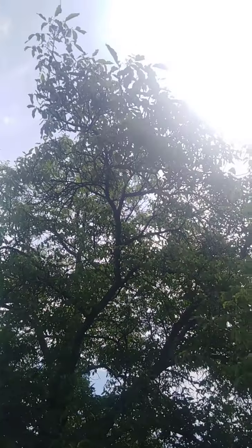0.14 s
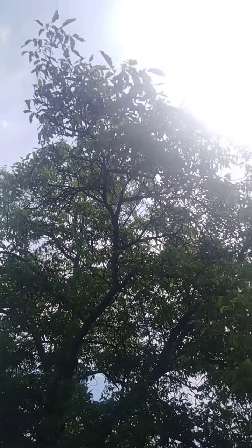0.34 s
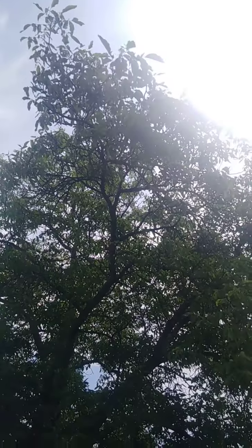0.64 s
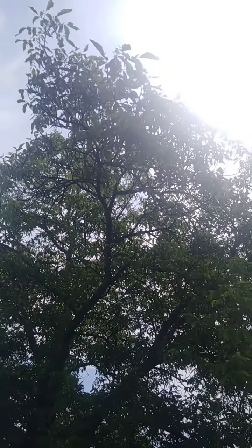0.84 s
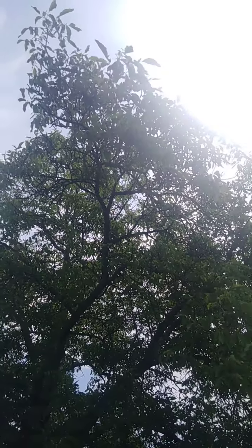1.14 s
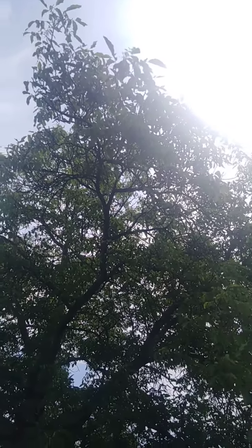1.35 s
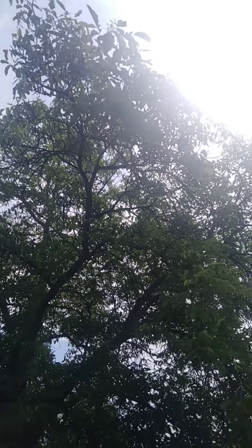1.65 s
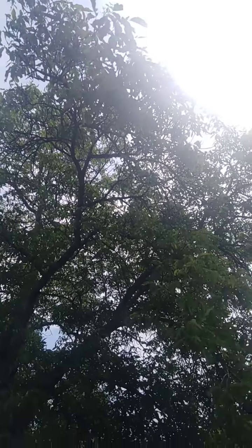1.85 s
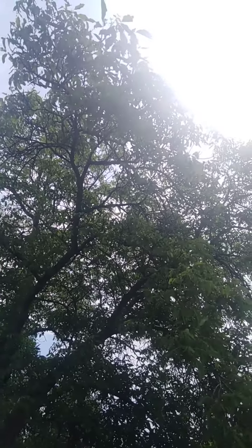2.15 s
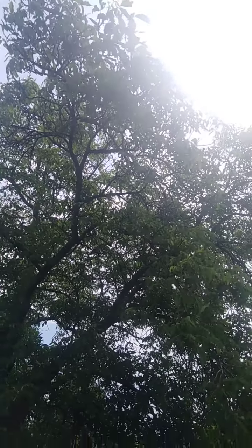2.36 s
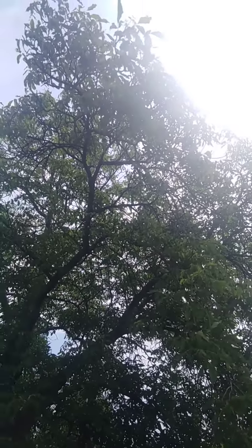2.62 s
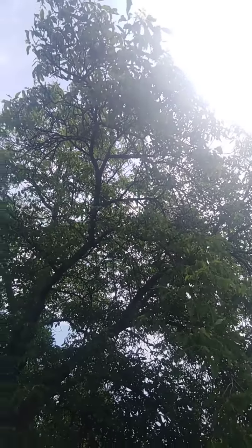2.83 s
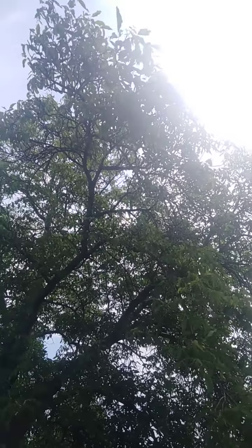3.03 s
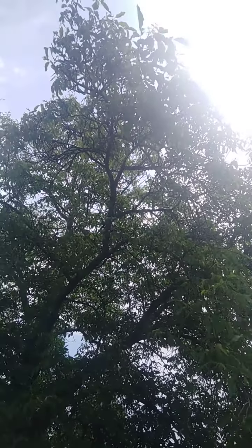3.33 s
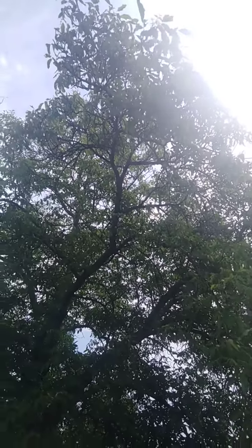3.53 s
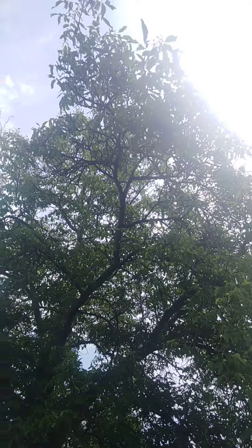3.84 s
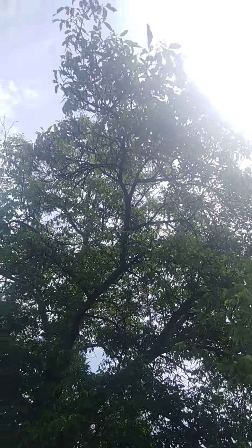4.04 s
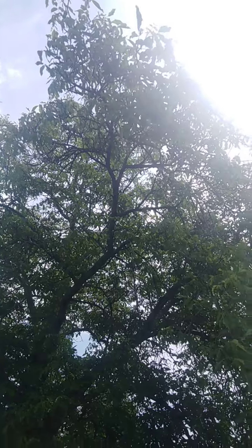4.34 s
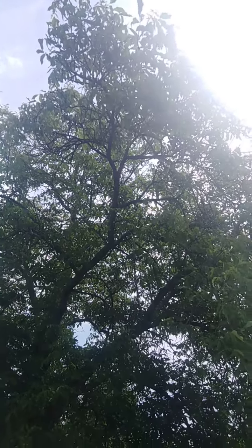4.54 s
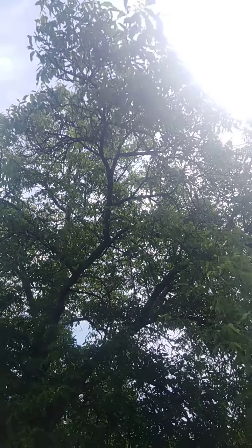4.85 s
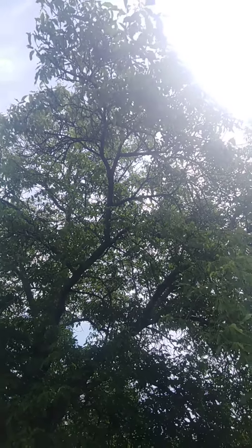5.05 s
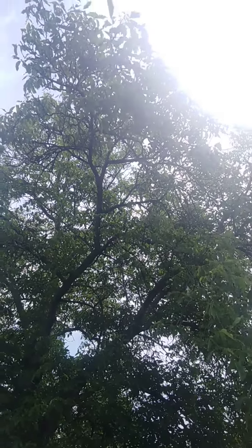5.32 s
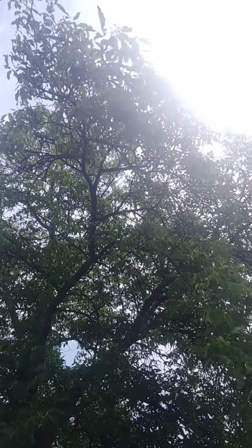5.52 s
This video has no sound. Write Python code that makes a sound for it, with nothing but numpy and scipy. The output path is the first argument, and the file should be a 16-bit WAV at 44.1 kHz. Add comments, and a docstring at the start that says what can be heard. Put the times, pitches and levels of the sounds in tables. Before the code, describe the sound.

Outdoors among leafy trees, a handheld microphone catches the end of one cuckoo call, then sharp knocks and snaps from the holding hand. Low wind gusts swell on the left, ease, and return harder. Over them the cuckoo gives three full two-note calls, softly echoed by the trees, while small birds whistle, chirp and rasp faintly.

```python
"""The far echo of a cuckoo's "cuck" opens the scene, over faint hiss and light wind, as fingers brush the
microphone's case. The "oo" follows, a swelling hoot thrown back by the trees; then the holding hand knocks
and snaps: decaying thuds, case rattle and noise cracks. Wind noise gusts twice with a lull between, mostly
at the left port, with hard low pushes. From 1.6 s small birds whistle, chirp and rasp in trilled tones and
rattling noise, while the cuckoo gives three full "cuck-oo"s."""
import sys
import numpy as np
from scipy import signal
from scipy.fft import rfft, irfft
from scipy.io import wavfile
from scipy.ndimage import uniform_filter1d

SR = 44100
rng = np.random.default_rng(int(sys.argv[2]) if len(sys.argv) > 2 else 0)


def wav_out(sig):
    """Save sig, one row per channel (or a flat mono array), as 16-bit PCM at SR to the path in sys.argv[1]."""
    wavfile.write(sys.argv[1], SR, np.round(np.clip(np.atleast_2d(sig).T, -1, 1) * 32767).astype(np.int16))


N = 250488
TIME = np.arange(N) / SR


def amp(db):
    """Decibels to gain."""
    return 10 ** (np.asarray(db) / 20)


def evened(x):
    """Scales to rms 1."""
    return x / np.sqrt(np.mean(x ** 2) + 1e-20)


def read(points, hz):
    """Reads a spectrum on a log-frequency axis."""
    f, value = np.transpose(points)
    return np.interp(np.log(hz + 1), np.log(f + 1), value)


def add(mix, s, sound):
    """Mixes a sound in at time s, cut off at the end of the mix."""
    part = mix[..., max(round(s * SR), 0):][..., :sound.shape[-1]]
    part += sound[..., :part.shape[-1]]


def tinted(x, colour):
    """Filters a sound by a colour table."""
    gain = amp(read(colour, np.fft.rfftfreq(N, 1 / SR)))
    return irfft(rfft(x) * gain, N)


def noise(colour):
    """Two unrelated channels of coloured noise, rms 1 together."""
    return evened(tinted(rng.standard_normal((2, N)), colour))


def drift(rate_hz):
    """A random curve of rms 1 that moves mostly slower than rate_hz."""
    lowpass = 1 / (1 + (np.fft.rfftfreq(N, 1 / SR) / rate_hz) ** 4)
    return evened(irfft(rfft(rng.standard_normal(N)) * lowpass, N))


def bursts(rows):
    """A level curve of soft-edged bursts."""
    level = np.zeros(N)
    for s, length, db in rows:
        add(level, s, amp(db) * signal.windows.tukey(int(length * SR), .5))
    return level


def progress(length):
    """Runs from 0 to 1 over a note of this length in s."""
    return np.linspace(0, 1, int(length * SR))


def trees(x, t60, onset_s):
    """Scatter from trunks and leaves: sparse taps that build up and die away, different at each port."""
    t = TIME[:SR]
    sparse = rng.standard_normal((2, SR)) * (rng.random((2, SR)) < .1)
    taps = sparse * amp(-60 * t / t60) * (1 - np.exp(-t / onset_s))
    taps = taps / np.linalg.norm(taps, axis=1, keepdims=True)
    return signal.fftconvolve(np.atleast_2d(x), taps, axes=1)[:, :N]


# spectrum of the open air: frequency_hz, relative_level_db
AIR_COLOUR = [(60, 16), (300, 15), (600, 10.5), (1200, 3), (3000, -0.5), (7000, -2.5), (14000, -5.5)]


def air(level_db=-80.5):
    """The faint hiss of the open air: steady coloured noise."""
    return amp(level_db) * noise(AIR_COLOUR)


# strength of the wind, two long gusts with a lull between: time_s, left_port_db, right_port_db
WIND_STRENGTH = [(0, -70.5, -75), (0.849, -70.5, -71.5), (1.358, -58, -73), (1.52, -37, -66),
                 (1.72, -30, -57), (2.301, -38.5, -60.5), (2.448, -33.5, -59), (2.622, -45.5, -64),
                 (3.3, -41.5, -56), (3.62, -44.5, -58), (3.708, -66, -70.5), (3.92, -46.5, -59.5),
                 (4.149, -34, -54.5), (4.55, -33.5, -49), (4.73, -24, -46), (5.0, -44, -47),
                 (5.408, -44.5, -47.5), (5.539, -69, -82.5)]
# spectra of light and of strong wind: frequency_hz, relative_level_db
LIGHT_WIND_COLOUR = [(20, -34.5), (45, -16.5), (65, -3), (100, 0), (140, -2.5), (220, -17), (300, -26),
                     (400, -48.5), (550, -57), (1000, -81.5)]
STRONG_WIND_COLOUR = [(20, -28.5), (45, -16), (65, -11), (130, -4), (220, -1.5), (300, -12), (400, -17),
                      (600, -43), (800, -45), (1300, -88)]


def wind(lump_db=3.0, lump_hz=22, strong_db=-29):
    """Eddies buffet each port on its own; strong gusts reach higher in pitch."""
    times, *ports = np.transpose(WIND_STRENGTH)
    gust = amp([np.interp(TIME, times, port) for port in ports])
    lumps = np.array([drift(lump_hz), drift(lump_hz)])
    gust = gust * evened(amp(lump_db * lumps))
    strong = gust / (gust + amp(strong_db))  # at strong_db this is one half
    light = np.sqrt(1 - strong ** 2)
    return gust * (light * noise(LIGHT_WIND_COLOUR) + strong * noise(STRONG_WIND_COLOUR))


# distant low-pitched birds, and at 0 s the far echo of an earlier "cuck",
# before direct and scatter gains: start_s, length_s, pitch_hz, level_db
FAR_NOTES = [(0.0, 0.11, 643, -58), (0.053, 0.052, 900, -64), (1.285, 0.022, 1250, -66.5),
             (1.303, 0.028, 631, -65.5), (4.226, 0.061, 811, -65), (4.875, 0.034, 827, -57),
             (4.924, 0.034, 1260, -68), (5.355, 0.018, 736, -66)]


def far_calls(wobble=0.0047, direct_db=-5, scatter_db=-3):
    """Short pure notes from deep in the wood, wavering in pitch, mostly heard as scatter."""
    clock = np.cumsum(1 + wobble * drift(45)) / SR  # wobble is a share of the pitch
    song = np.zeros(N)
    for s, length, hz, db in FAR_NOTES:
        song += bursts([(s, length, db)]) * np.sin(2 * np.pi * hz * clock)
    return amp(direct_db) * song + amp(scatter_db) * trees(song, t60=.45, onset_s=0.0038)


# fingers brushing the case: start_s, length_s, level_db
FINGER_BRUSHES = [(0.0, 0.02, -53), (0.02, 0.061, -63.5), (0.068, 0.048, -66.5)]
# dull scrapes of the grip on the case, before the left port's cut: start_s, length_s, level_db
GRIP_SCRAPES = [(0.46, 0.041, -59), (2.60, 0.16, -63.5)]
# handling knocks, before port cuts: start_s, thud_db, thud_hz, crack_db, crack_decay_s, hiss_db
HAND_KNOCKS = [(0.4630, -39, 130, -56, .0099, -97.5), (0.5107, -44, 245, -80, .003, -99),
               (0.7015, -36.5, 182.7, -16.5, 0.0051, -63.5), (0.7091, -37.5, 224.3, -20, 0.0013, -88),
               (0.7540, -34, 287, -6, 0.0013, -76), (0.784, -47, 240, -53.5, 0.001, -90.5),
               (2.143, -36, 400, -29, 0.0036, -71.5), (2.5824, -26.5, 241, -25, 0.003, -69.5),
               (2.8746, -44.5, 110, -4.5, 0.00078, -50), (3.878, -46.5, 256, -70, .002, -99),
               (4.305, -46.5, 340, -76, 0.0012, -99)]
# spectra of brushes, case rattle, and cracks with their hiss: frequency_hz, relative_level_db
BRUSH_SPECTRUM = [(200, -25.5), (450, 3.5), (750, 15.5), (1150, -7.5), (2000, -2), (2700, -19.5),
                  (4200, -0.5), (5200, -19), (6800, -1.5), (10000, -12.5), (14000, -40.5)]
CASE_SPECTRUM = [(100, -15.5), (450, 12), (800, 5.5), (1100, -6), (1700, -1.5), (2100, -15.5), (2600, -41),
                 (5000, -20), (14000, -66.5)]
CRACK_SPECTRUM = [(100, -13), (600, -1.5), (2200, -17.5), (3500, -6.5), (6000, -2.5), (9000, -1.5),
                  (12000, -5.5), (14000, -12.5)]


def handling(thud_cycles=1.0, case_db=-8, case_s=0.0064, ring_db=-27, ring_s=0.024, thud_left_db=-8,
             crack_right_db=-21, hiss_t60=0.36, hiss_right_db=-8):
    """Each knock thuds and rattles in the case near the right port and cracks near the left one."""
    thuds, cracks, case, hiss = np.zeros((4, N))
    t = TIME[:SR // 2]
    # the case answers with a quick rattle and a weaker, longer ring
    rattle = amp(case_db) * np.exp(-t / case_s) + amp(ring_db) * np.exp(-t / ring_s)
    for s, thud_db, hz, crack_db, crack_s, hiss_db in HAND_KNOCKS:
        add(thuds, s, amp(thud_db) * np.sin(2 * np.pi * hz * t) * np.exp(-t * hz / thud_cycles))
        add(case, s, amp(thud_db) * rattle)
        crack = rng.standard_normal(len(t)) * np.exp(-t / crack_s)
        add(cracks, s, amp(crack_db) * crack / np.linalg.norm(crack))
        add(hiss, s, amp(hiss_db - 60 * t / hiss_t60))
    case_noise = (case + bursts(GRIP_SCRAPES)) * noise(CASE_SPECTRUM)
    low = (thuds + case_noise) * amp([[thud_left_db], [0]])
    high = tinted(cracks, CRACK_SPECTRUM) * amp([[0], [crack_right_db]])
    tail = hiss * amp([[0], [hiss_right_db]]) * noise(CRACK_SPECTRUM)
    return low + high + tail + bursts(FINGER_BRUSHES) * noise(BRUSH_SPECTRUM)


# the long, level "oo", level before the droop:
# start_s, length_s, pitch_hz, level_db, left_port_db, overtones_db
OO_NOTES = [(0.202, 0.16, 552.4, -39.5, -13.5, -5.5), (1.945, 0.17, 549, -42.5, -9, -7),
            (3.396, 0.17, 562.8, -39, -16.5, -11), (4.677, 0.17, 560.9, -36.5, -10, -26)]
# the short, arching "cuck", level before the droop:
# start_s, top_pitch_hz, level_db, left_port_db, overtones_db
CUCK_NOTES = [(1.668, 679, -38, -9, 2), (3.115, 690.7, -38.5, -1, -4.5), (4.389, 701, -36, -3.5, -15)]
# weak overtones, added to each note's overtones_db: multiple, level_db
VOICE_OVERTONES = [(2, -32), (3, -51.5), (5, -52.5)]
# breathy edge of the voice: frequency_hz, relative_level_db
HUSK_SPECTRUM = [(700, -38), (1350, -7.5), (1600, -5), (1950, 6), (2300, -25), (2800, -23.5), (4000, -45),
                 (14000, -71.5)]
# echoes from the trees, before their sway: delay_s, level_db
TREE_ECHOES = [(.045, -24), (.102, -22), (.139, -32.5)]
CUCK_S = 0.091  # length of a "cuck"
CUCK_SAG, OO_SAG = .24, 0.025  # share by which the pitch sags at both ends of a note


def cuckoo(edge_s=0.044, port_delay_s=0.0003, scatter_db=-26, rasp=0.46, first_echo_db=-6, droop_db=2,
           sway_hz=32, echo_sway=.45, husk_db=-45, pitch_jitter=.002):
    """A nearly pure hoot: "cuck" arches in pitch, "oo" stays level; the trees echo and scatter it."""
    voice, waver, grit = np.zeros((2, N)), drift(86), 1 + rasp * drift(61)
    husk = noise(HUSK_SPECTRUM)[0]
    notes = [(CUCK_SAG, s, CUCK_S, *rest) for s, *rest in CUCK_NOTES]
    notes += [(OO_SAG, *row) for row in OO_NOTES]
    for sag, s, length, hz, db, left_db, bright_db in notes:
        t = TIME[:int(length * SR)]
        now = int(s * SR) + np.arange(len(t))
        arch = 1 - sag * (2 * t / length - 1) ** 2
        pitch = hz * arch * (1 + pitch_jitter * waver[now])
        phase = 2 * np.pi * np.cumsum(pitch) / SR
        swell = np.sin(np.pi / 2 * np.clip(np.minimum(t, length - t) / edge_s, 0, 1))
        swell = swell * amp(droop_db * (3.5 - t / length))  # lifted 7 dB at its start, 5 dB at its end
        # the overtones are uneven in level
        stack = sum(amp(bright_db + k_db) * np.sin(round(k) * phase) for k, k_db in VOICE_OVERTONES)
        overtones = swell * grit[now] * stack
        # breath favours the full-strength middle of the note
        overtones = overtones + amp(bright_db + husk_db) * swell ** 2 * husk[now]
        hoot = amp([[left_db], [0]]) * np.sin(phase)
        add(voice, s, np.sqrt(2) * amp(db) * swell * (hoot + overtones))
    # the first note echoes less than the later calls
    sent = voice[1] * amp(first_echo_db * (TIME < 1))
    out = amp(scatter_db) * trees(sent, t60=0.58, onset_s=0.2)
    for delay, db in TREE_ECHOES:
        add(out, delay, amp(db) * sent)
    # the echoes waver in level and phase, which blurs their pitch
    sway = 1 + echo_sway * (drift(sway_hz) + 1j * drift(sway_hz))
    out = (signal.hilbert(out) * sway).real
    add(out[0], port_delay_s, voice[0])
    add(out[1], 0, voice[1])
    return out


# low pushes on the left port: a soft thud at 0.655 s, then hard wind buffets:
# centre_s, level_db, frequency_hz
LOW_PUSHES = [(0.655, -33, 91), (1.737, -24.5, 230), (1.809, -20.5, 226), (2.053, -20, 186),
              (2.423, -23.5, 155), (3.285, -25.5, 192), (4.125, -24.5, 152), (4.638, -17.5, 181.5),
              (4.734, -16, 187), (5.095, -24, 134)]


def low_pushes(cycles=0.55):
    """A soft thud, then wind buffets: each a quick push and pull, a sine under a bell curve."""
    out, half = np.zeros((2, N)), SR // 32
    for s, db, hz in LOW_PUSHES:
        turns = hz * np.arange(-half, half) / SR
        push = np.sin(2 * np.pi * turns) * np.exp(-(turns / cycles) ** 2)
        add(out[0], s - half / SR, amp(db) * push)
    return out


# songbird levels in the next three tables are before flutter and scatter
# whistles: start_s, length_s, pitch_hz, level_db, trill_depth_hz, right_port_db
BIRD_WHISTLES = [(1.641, 0.18, 3693, -70.5, 70.3, 3), (1.711, 0.045, 5130, -72.5, 44, -3),
                 (1.889, 0.14, 5230, -68, 44.6, -1.5), (2.047, 0.14, 7815, -65.5, 124, 2.5),
                 (2.101, .13, 3620, -64.5, 59.7, -6.5), (2.363, .08, 5270, -58, 196, -1.5),
                 (2.586, 0.13, 3600, -65, 104.7, 0), (2.827, 0.11, 4940, -52, 70, -13),
                 (3.082, .07, 7360, -62.5, 84.8, 1), (3.071, .18, 3597, -62.5, 149.4, 2),
                 (3.125, 0.09, 5360, -64.5, 131, -7), (3.334, 0.13, 5014, -50, 174, -16.5),
                 (4.104, .037, 5400, -72.5, 145, -1.5), (4.375, .12, 4760, -71.5, 30.28, -8),
                 (4.557, 0.047, 7330, -74.5, 30.05, 1), (5.191, 0.037, 4440, -69.5, 40, -7),
                 (5.362, .053, 2424, -69, 200, -2.5), (5.581, 0.07, 4130, -64, 234, 3)]
# two-part chirps: start_s, hook_delay_s, sweep_end_hz, sweep_db, hook_db (at mid-hook)
BIRD_CHIRPS = [(2.162, .035, 5690, -52.5, -47), (2.337, 0.028, 5600, -53.5, -47.5),
               (3.430, 0.0055, 6740, -61, -52), (3.529, 0.017, 6440, -60.5, -57.5)]
# a chattering bird's harsh notes, before rasp_db: start_s, level_db
BIRD_RASPS = [(2.93, -62.5), (3.76, -59.5), (3.866, -56.5), (3.993, -63), (4.103, -68)]
# spectrum of the harsh notes: frequency_hz, relative_level_db
RASP_SPECTRUM = [(1500, -40.5), (2000, -25), (2500, -24), (3100, -15), (3800, 7), (4800, 5.5), (5600, -5),
                 (6400, -62.5), (9000, -45)]
SLUR = 0.057  # a whistle starts this share above its pitch and settles
SWEEP_S, SWEEP_FROM_HZ = 0.039, 4400  # a chirp starts with a trilled sweep
HOOK_S, HOOK_FROM_HZ, HOOK_TOP_HZ = 0.04, 2770, 4117  # then a clear hook
HOOK_PEAK = .7  # share of the hook's length at which it is highest
RASP_S, CHIRP_RASP_DB = 0.067, -3.5  # length of a rasp; its trim within a chirp, against the sweep


def songbirds(trill_hz=150, sweep_depth_hz=200, swell_db=12, scatter_db=-4, rasp_db=-2, rattle_db=-0.5,
              flutter_db=3.0, wobble_hz=38):
    """Slurred, trilled whistles, two-part chirps and harsh, rattling notes, smeared by the foliage."""
    harsh = [(s, RASP_S, db) for s, db in BIRD_RASPS]
    harsh += [(s, RASP_S, db + CHIRP_RASP_DB) for s, _, _, db, _ in BIRD_CHIRPS]
    rattle = evened(amp(rattle_db * drift(100)))
    rasps = amp(rasp_db) * bursts(harsh) * noise(RASP_SPECTRUM)[0] * rattle
    song = np.ones((2, 1)) * rasps
    wobble = wobble_hz * drift(180)

    def note(s, glide, depth_hz):
        """A soft-edged tone that trills and wobbles around a pitch glide."""
        t = TIME[:len(glide)]
        trill = depth_hz * np.sin(2 * np.pi * (trill_hz * t + rng.random()))
        pitch = glide + trill + np.interp(s + t, TIME, wobble)
        return signal.windows.tukey(len(t), 1 / 4) * np.sin(2 * np.pi * np.cumsum(pitch) / SR)

    for s, length, hz, db, depth_hz, right_db in BIRD_WHISTLES:
        slur = hz * (1 + SLUR * (1 - progress(length)) ** 3)
        add(song, s, amp([[db], [db + right_db]]) * note(s, slur, depth_hz))
    for s, lag, end_hz, sweep_db, hook_db in BIRD_CHIRPS:
        sweep = SWEEP_FROM_HZ + (end_hz - SWEEP_FROM_HZ) * progress(SWEEP_S)
        add(song, s, amp(sweep_db) * note(s, sweep, sweep_depth_hz))
        u = progress(HOOK_S)
        hook = HOOK_TOP_HZ - (HOOK_TOP_HZ - HOOK_FROM_HZ) * (1 - u / HOOK_PEAK) ** 2
        add(song, s + lag, amp(hook_db + swell_db * (u - .5)) * note(s + lag, hook, 0))
    song = song * evened(amp(flutter_db * drift(160)))  # the notes flutter in level
    return song + amp(scatter_db) * trees(song, t60=0.32, onset_s=0.012)


def suppressor(x, open_db=-62, depth_db=-8, window_s=.03):
    """Turns the sound down, by up to depth_db, whenever its short-term power falls to a quiet level."""
    power = abs(uniform_filter1d((x ** 2).mean(0), int(window_s * SR)))
    return x * amp(depth_db / (1 + power / amp(open_db) ** 2))


def scene():
    """All sources at the two ports."""
    return air() + wind() + far_calls() + handling() + cuckoo() + low_pushes() + songbirds()


def record(dry, low_cut_hz=36, edge_hz=14300):
    """The recorder's bass cut, noise suppressor and band limit."""
    bass_cut = signal.butter(2, low_cut_hz, "high", fs=SR, output="sos")
    sound = signal.sosfiltfilt(bass_cut, dry, padtype="even")
    band_limit = signal.firwin(511, edge_hz, window=("kaiser", 9), fs=SR)
    return signal.oaconvolve(suppressor(sound), band_limit[None], "same")


dry = scene()
out = record(dry)
wav_out(out)
```